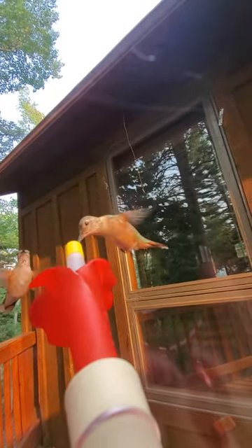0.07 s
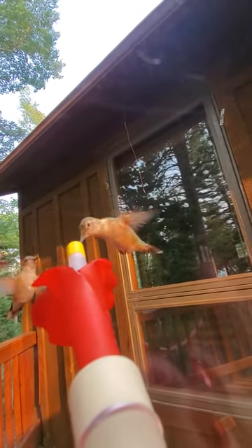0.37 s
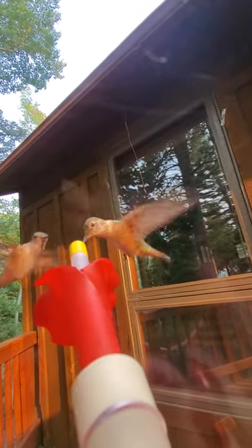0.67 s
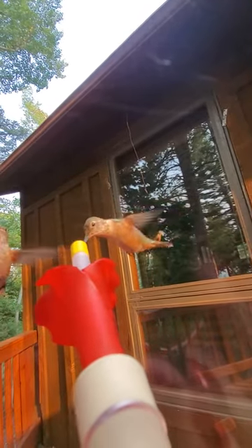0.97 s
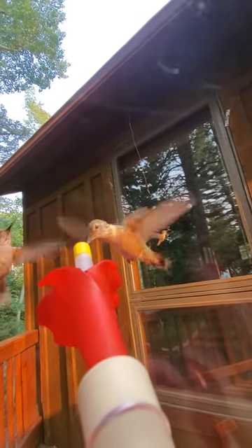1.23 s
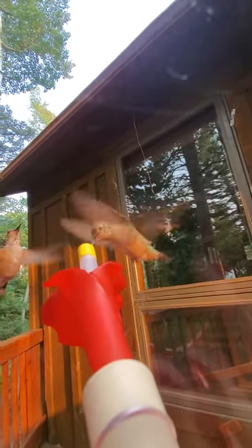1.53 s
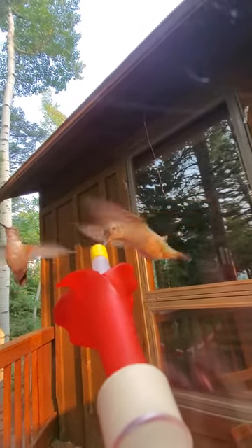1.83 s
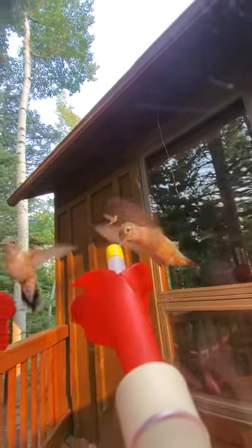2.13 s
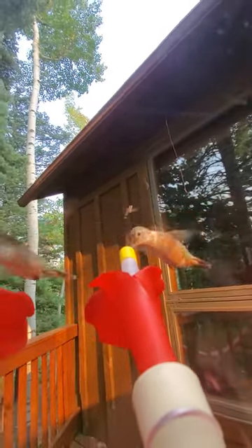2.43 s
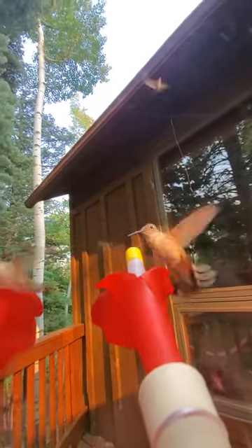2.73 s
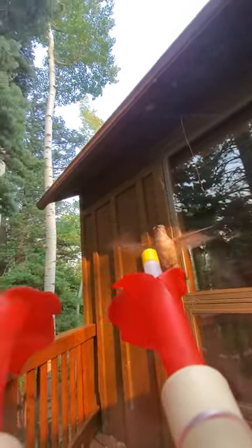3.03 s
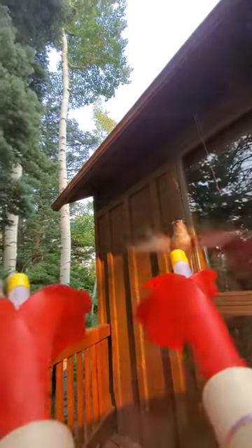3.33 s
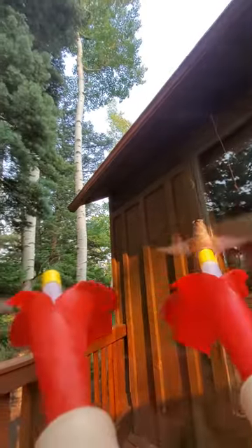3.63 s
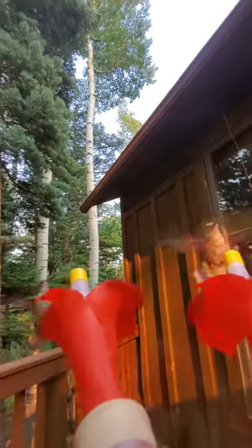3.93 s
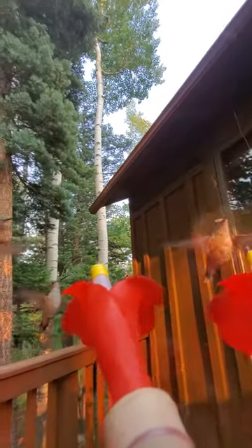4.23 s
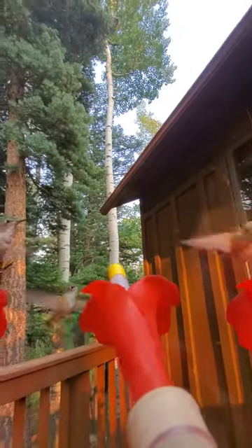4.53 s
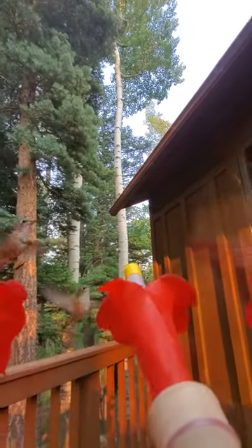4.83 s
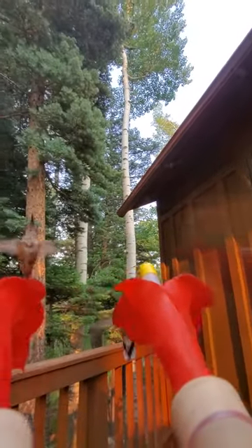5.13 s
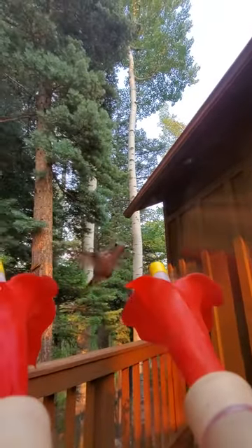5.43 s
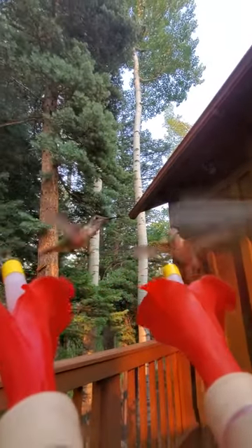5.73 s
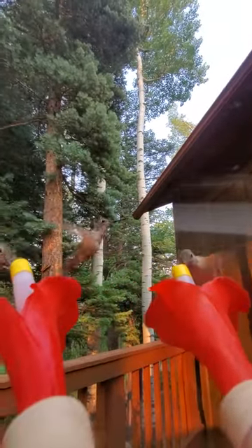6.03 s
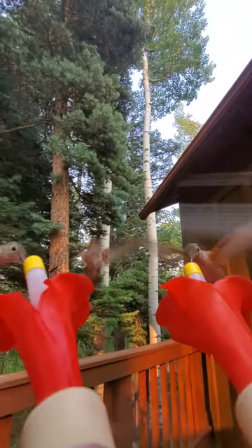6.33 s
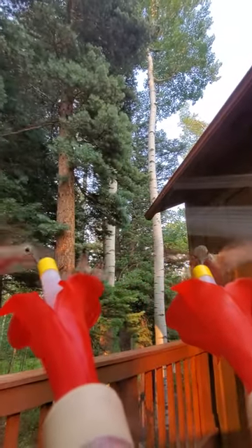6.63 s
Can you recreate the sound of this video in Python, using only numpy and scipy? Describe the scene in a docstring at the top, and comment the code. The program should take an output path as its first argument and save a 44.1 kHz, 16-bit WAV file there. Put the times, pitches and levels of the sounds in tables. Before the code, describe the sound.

A deep, pulsing buzz of hummingbird wings right by the microphone, with sharp falling chirps and a few light knocks on plastic feeders.

```python
"""A low, throbbing hum of hummingbirds hovering close by at feeders on a wooden porch.
Three birds push the air at slightly different wingbeat rates, so their hums beat against each other,
while their feathers swish and fizz. They trade short, falling chips, and the plastic feeders ring
under a few light knocks; both reflect from the porch. A soft outdoor hiss lies under it all."""
import sys
import numpy as np
from scipy import signal
from scipy.fft import rfft, irfft, next_fast_len
from scipy.io import wavfile
from scipy.ndimage import uniform_filter1d

SR = 44100
rng = np.random.default_rng(int(sys.argv[2]) if len(sys.argv) > 2 else 0)


def wav_out(sig):
    """Save sig, one row per channel (or a flat mono array), as 16-bit PCM at SR to the path in sys.argv[1]."""
    wavfile.write(sys.argv[1], SR, np.round(np.clip(np.atleast_2d(sig).T, -1, 1) * 32767).astype(np.int16))


N = 299439
TIME = np.arange(N) / SR

# Flight of the two slower birds: time_s, wingbeat_hz, hum_db (levels in all tables are relative)
SLOW_FLIGHT = [(0.0, 38.16, -35.8), (0.28, 36.46, -32.5), (0.9, 39.5, -38.9), (1.62, 36.82, -31.8),
               (1.82, 37.66, -31.1), (1.99, 36.24, -36.9), (2.34, 37.62, -30.0), (2.78, 38.12, -34.6),
               (3.12, 34.68, -37.5), (4.38, 34.39, -40.8), (4.56, 35.21, -37.7), (5.29, 36.03, -33.5),
               (5.52, 36.71, -34.6), (5.76, 38.44, -32.3), (5.94, 37.29, -36.2), (6.13, 37.89, -33.8),
               (6.28, 39.75, -37.3), (6.79, 37.8, -36.1)]
MIDDLE_FLIGHT = [(0.0, 40.86, -32.4), (0.31, 41.14, -38.9), (0.56, 42.25, -32.7), (0.9, 40.4, -37.5),
                 (1.67, 41.82, -37.1), (2.4, 40.03, -43.1), (2.63, 39.81, -38.7), (3.84, 39.91, -42.7),
                 (4.17, 39.58, -36.8), (4.42, 40.21, -37.4), (4.8, 38.14, -34.7), (5.09, 37.66, -31.8),
                 (5.26, 38.5, -40.1), (5.77, 40.67, -39.3), (5.99, 41.07, -32.8), (6.2, 39.9, -32.8),
                 (6.36, 42.37, -32.7), (6.79, 39.76, -34.6)]


def wings(flight, level_db, beat_db, third_db, overtone_db, churn_db, side_db):
    """Periodic forcing: two pushes a beat sound twice the beat rate; unequal strokes add odd harmonics."""
    # Spectral envelope of the strokes' overtones: frequency_hz, level_db
    overtones = [(100, -2), (150, 4), (200, -3), (270, -6), (380, -10), (520, -19), (900, -45)]
    # Spectrum of the churned air: frequency_hz, level_db
    turbulence = [(20, -50), (45, 6), (70, -4), (105, 6.5), (160, 5.5), (260, -7.5), (420, -13.5),
                  (650, -32.5), (1000, -30), (3000, -41.5), (9000, -50)]
    jitter_cycles, uneven_db = 0.013, 2.88
    beat_hz, hum_db = follow(flight)
    phase = phase_of(beat_hz) + 2 * np.pi * jitter_cycles * wander(32)
    odd = gain_of(beat_db) * np.sin(phase) + gain_of(third_db) * np.sin(3 * phase)
    # a louder hum has more equal strokes
    odd *= gain_of(uneven_db * wander(10.5) - 0.53 * (hum_db - hum_db.mean()))
    hum = np.sqrt(2) * gain_of(hum_db + level_db) * (np.cos(2 * phase) + odd)
    # the wing flips at the end of a stroke: a sharp push, rich in overtones
    flip = sum(gain_of(value_at(overtones, k * beat_hz.mean())) * np.sin(k * phase) for k in range(4, 22))
    flip = unit_rms(flip * gain_of(uneven_db * wander(17)))
    # every stroke sheds a puff of turbulent air
    puffs = unit_rms(gain_of(1.6 * np.cos(2 * phase) + np.cos(phase)))
    churn = puffs * noise(turbulence, turbulence, patchy_db=-1)
    slap = slap_gain(hum_db) * (gain_of(overtone_db) * flip + gain_of(churn_db) * churn)
    return pan(hum, side_db) + pan(slap, 0.51 * side_db)


def slap_gain(hum_db, base_db=-43.5, hum_share=0.28):
    """Amplitude envelope of the wings' slap: it follows the hum and swells with harder strokes."""
    # Flurries as the birds jostle: centre_s, length_s, boost_db
    flurries = [(.25, .3, -0.5), (0.635, 0.1, 4), (0.751, .1, 7.5), (0.924, .14, 2), (1.255, 0.47, 1),
                (2.376, 0.076, 8), (2.782, .16, 3.5), (3.08, 0.75, 2.5), (3.477, 0.053, 7),
                (4.585, 0.18, 3.5), (5.087, 0.084, 5), (5.32, .12, 3), (5.513, 0.42, 5), (5.838, 0.12, 4),
                (6.74, 0.19, 8)]
    flurry_db = sum(boost_db * np.cos(np.pi * np.clip((TIME - centre_s) / length_s, -.5, .5)) ** 2
                    for centre_s, length_s, boost_db in flurries)
    return gain_of(base_db + hum_share * (hum_db - hum_db.mean()) + flurry_db)


def darts():
    """A darting bird's few hard strokes radiate a low tone burst that swells and fades."""
    # Bursts of strokes: centre_s, level_db, pitch_hz, length_s
    bursts = [(.903, -16.5, 95, 0.053), (1.31, -29, 78, .08), (2.362, -24, 104.3, 0.1),
              (2.847, -20, 91, 0.062), (3.476, -27.5, 117, 0.048), (4.53, -22.5, 94, 0.051),
              (5.46, -23.5, 85, .12), (5.69, -24, 95, 0.025)]
    out = np.zeros((2, N))
    for centre_s, level_db, pitch_hz, length_s in bursts:
        t = np.arange(-length_s / 2, length_s / 2, 1 / SR)
        burst = gain_of(level_db) * np.hanning(len(t)) * np.cos(2 * np.pi * pitch_hz * t)
        add(out, centre_s - length_s / 2, pan(burst, side_db=-5.5))
    return out


def chips(length_s=0.032, glide_s=0.0062, sag_hz_per_s=8300, rasp=0.032, flutter_db=4):
    """Source and filter: a whistle dives in pitch, sweeping its harmonics through the bill's resonances."""
    # Calls: start_s, level_db, top_hz, low_hz, pause_s (at the top), overtone_db, side_db
    calls = [(.002, -35.5, 7100, 2080, 0, -8.5, -19), (.112, -35.5, 7300, 1970, 0, -9, -14),
             (.302, -51, 7800, 2300, 0, -12, -12), (.348, -35, 7250, 2080, 0, -9.5, -12),
             (.593, -36, 7100, 2250, 0, -9, -10), (.706, -37, 7380, 1900, 0.00014, -12, -14),
             (0.859, -37.5, 7420, 2140, 0, -9, -15.5), (1.270, -40, 6850, 2250, 0, -10.5, -10),
             (1.327, -52, 7700, 2240, 0.0019, -10, -4), (1.574, -41, 6530, 2270, 0.00014, -11, -10),
             (1.768, -55.5, 7660, 2320, .002, -7, -10), (2.068, -34.5, 7140, 2360, 0, -4, -2.5),
             (2.167, -31, 6700, 2570, 0, -6, -4.5), (2.428, -36.5, 7150, 2150, 0.0006, -9, -8),
             (2.561, -56, 7500, 2400, 0.0018, 0, -7), (3.026, -36.5, 6570, 2380, 0.00088, -6.5, -3.5),
             (3.18, -40, 6200, 2140, 0.00044, -8.5, -7), (3.626, -43.5, 5770, 2180, 0, -8, -12),
             (4.530, -39, 5910, 2220, 0.00062, -6, -11), (4.950, -36.5, 7800, 1550, 0.0018, -6, -11),
             (5.074, -36, 6900, 2190, 0.00062, -4, -12), (5.166, -35.5, 6550, 2200, 0, -2.5, -10.5),
             (5.311, -30.5, 8400, 1506, 0.0026, -5.5, -8.5), (5.452, -35, 6770, 2100, 0.0012, -8, -11),
             (5.574, -37.5, 6800, 2000, .001, -3.5, -12), (5.825, -37.5, 6130, 2040, 0.0012, -14, 16),
             (6.106, -34.5, 8530, 1470, 0.0013, -6.5, -10), (6.511, -44, 5900, 1550, 0.0022, -5.5, 12),
             (6.599, -34.5, 7100, 1250, 0.0022, -5, 7.5)]
    # Response of the throat and open bill: frequency_hz, gain_db
    bill = [(2000, 2), (2700, 4.5), (3200, -3.5), (4200, -3), (4900, 0), (5800, -6.5), (7200, 4.5),
            (8500, -5), (11000, -11.5), (14000, -1.5), (16000, -13)]
    rise_s, hold_s, drop_s, release_s = 0.00098, 0.0041, 0.0025, 0.013
    out, t = np.zeros((2, N)), np.arange(0, length_s, 1 / SR)
    # a loud head, then a weaker tail that peters out
    tail_s = np.maximum(t - hold_s, 0)
    envelope = gain_of(-8 * (1 - np.exp(-tail_s / drop_s)) - 250 * tail_s)
    envelope *= np.minimum(t / rise_s, 1) * np.clip((length_s - t) / release_s, 0, 1)
    for start_s, level_db, top_hz, low_hz, pause_s, overtone_db, side_db in calls:
        wobble = uniform_filter1d(rng.standard_normal((6, 4096)), size=48)
        wobble = unit_rms(uniform_filter1d(wobble, size=24))[:, :len(t)]
        dive_hz = (top_hz - low_hz) / (1 + np.maximum(t - pause_s, 0) / glide_s)
        hz = (low_hz + dive_hz - sag_hz_per_s * t) * (1 + rasp * wobble[0])
        phase = phase_of(hz)
        partials = [gain_of(value_at(bill, k * hz) + flutter_db * wobble[k])
                    * (k * hz < SR / 2) * np.sin(k * phase) for k in range(1, 6)]
        overtones = sum(gain_of(-4 * k) * partial for k, partial in enumerate(partials[1:]))
        bloom = np.clip((7400 - hz) / 3300, .25, 1)  # overtones grow as the pitch falls
        call = envelope * (partials[0] + bloom * gain_of(overtone_db + 7) * overtones)
        add(out, start_s, pan(gain_of(level_db + 3) * call, side_db))
    return out


def knocks(scuff_db=-8, scuff_t60_s=0.024, cutoff_hz=3100):
    """A light impact scuffs the plastic feeder and excites its damped modes; soft contact lacks treble."""
    # Blows on a feeder: start_s, level_db, side_db
    blows = [(3.181, -41.5, 7), (3.561, -39.5, 8), (4.258, -35.5, 3), (4.535, -37, 11), (4.932, -33.5, 13),
             (5.657, -30, 26), (6.210, -34, 5), (6.218, -33, 17), (6.4205, -35.5, 16)]
    # Modes of the feeder: frequency_hz, level_db, t60_s
    modes = [(647.5, 11, 0.11), (680, 10.5, 0.029), (1035, 7.5, 0.053), (1147, 2.5, 0.055),
             (1504, 6.5, 0.056), (1790, -25, 0.038), (2000, -39, .03), (2510, -11, 0.036)]
    out, t = np.zeros((2, N)), np.arange(SR // 4) / SR
    scuff_band = signal.butter(2, [550, 2200], "bandpass", fs=SR, output="sos")
    for start_s, level_db, side_db in blows:
        ring = np.zeros(len(t))
        for hz, mode_db, t60_s in modes:
            decay = gain_of(mode_db + 2 * rng.standard_normal() - 60 * t / t60_s)
            ring += decay * rng.choice([-1, 1]) * np.sin(2 * np.pi * hz * t)
        scuff = unit_rms(signal.sosfilt(scuff_band, rng.standard_normal(len(t))))
        scuff *= gain_of(scuff_db - 60 * t / scuff_t60_s)
        knock = ring / abs(ring).max() + scuff
        add(out, start_s, pan(gain_of(level_db + 1.4) * knock, side_db))
    return signal.sosfilt(signal.butter(4, cutoff_hz, fs=SR, output="sos"), out)


def feather_swish():
    """Modulated flow noise: once a beat the slowest bird's feathers rush through the air."""
    # Strength of the swish as the wings face the microphone: time_s, level_db
    swells = [(0, -54.5), (.9, -59), (1.7, -56), (1.9, -61.5), (2.4, -58), (2.9, -62), (3.5, -79),
              (4.4, -92), (5.1, -63), (5.8, -58.5), (6.2, -70), (6.79, -56)]
    # Spectrum of the swish: frequency_hz, level_db
    spectrum = [(300, 7), (800, -4), (1060, -1), (1350, -10), (2050, 0.5), (3100, -8), (4200, -15.5),
                (5200, -11), (6800, -12.5), (8000, -26), (11000, -25), (14000, -12), (16000, -13)]
    phase = phase_of(follow(SLOW_FLIGHT)[0])
    strokes = .35 + np.exp(2.5 * (np.cos(phase) - 1))
    hiss = noise(spectrum, spectrum, patchy_db=3)
    strokes = unit_rms(strokes * gain_of(1.5 * wander(16.3)))
    return pan(gain_of(follow(swells)[0]) * strokes * hiss, side_db=-6)


def feather_fizz(level_db=-70.5):
    """Flow noise between the wing tips ticks on both strokes; two birds' ticks merge into a high fizz."""
    # Spectrum of the fizz: frequency_hz, level_db
    spectrum = [(6000, -25), (9500, -9), (11300, -8), (12500, -6.5), (15500, -0.5), (17000, -34)]
    phases = [phase_of(follow(flight)[0]) for flight in (SLOW_FLIGHT, MIDDLE_FLIGHT)]
    ticks = .4 + sum(np.exp(3 * (np.cos(2 * phase) - 1)) * gain_of(2.5 * wander(40)) for phase in phases)
    hiss = noise(spectrum, spectrum, patchy_db=1)
    return pan(gain_of(level_db) * unit_rms(ticks) * hiss, side_db=-6)


def porch(direct, early_db=-10, early_t60_s=0.055, tail_db=-13):
    """Reverberation: early reflections from feeder, wall and eaves, then a tail whose treble dies first."""
    # Reverberation time of the porch: frequency_hz, t60_s
    decay_times = [(500, .22), (4000, .2), (7000, .19), (10000, .12), (16000, .08)]
    size = SR // 2
    taps = rng.standard_normal((2, size)) * (rng.random((2, size)) < .1)
    taps[:, :round(.001 * SR)] = 0
    hz, t, spectra = signal.stft(taps, SR, nperseg=256)
    decay = gain_of(-60 * t / value_at(decay_times, hz)[:, None])
    tail = signal.istft(spectra * decay, SR, nperseg=256)[1][:, :size]
    early = taps[::-1] * gain_of(-60 * TIME[:size] / early_t60_s)
    response = gain_of(tail_db) * tail / np.linalg.norm(tail[0])
    response += gain_of(early_db) * early / np.linalg.norm(early[0])
    return direct + signal.fftconvolve(direct.mean(0)[None], response, axes=1)[:, :N]


def air_rush():
    """Narrow-band noise near 1 kHz: a thin rush of air that swells and fades."""
    # Strength of the rush: time_s, level_db
    swells = [(0, -84), (.55, -60), (1.2, -78), (1.8, -71.5), (2.15, -61.5), (2.8, -72), (3.3, -65.5),
              (3.8, -74), (6.79, -78)]
    # Spectrum of the rush: frequency_hz, level_db
    spectrum = [(600, -40), (900, -14), (1060, -0.5), (1200, -28), (1500, -54)]
    return gain_of(follow(swells)[0]) * noise(spectrum, spectrum, patchy_db=2.5)


def outdoor_air(level_db=-54):
    """Broadband ambient noise: steady air with a thin, high hiss."""
    # Spectrum of the air on each side: frequency_hz, level_db
    left = [(30, -29), (430, -1.5), (600, 7.5), (690, 2), (880, -15), (1100, -11), (1500, -19), (1850, -15),
            (2200, -32), (3000, -26), (4500, -36.5), (6500, -26.5), (9000, -46), (15000, -23.5)]
    right = [(30, -43), (300, -12.5), (500, -0.5), (680, -12), (1100, -17.5), (1800, -7), (2400, -19),
             (2900, -19.5), (4500, -65), (6500, -26.5), (8000, -27.5), (11000, -29.5), (13000, -23.5),
             (15500, -27)]
    return gain_of(level_db) * noise(left, right, patchy_db=1.83)


def noise(left, right, patchy_db):
    """Partly coherent stereo noise with a spectrum for each side, its level drifting in patches."""
    # Likeness of left and right: frequency_hz, coherence
    likeness = [(50, 1), (300, 0.87), (700, 0.37), (1500, 0), (5000, 0.22), (15000, 0)]
    hz = np.fft.rfftfreq(2048, 1 / SR)
    real, imag, other_real, other_imag, patches = rng.standard_normal((N // 512 + 5, 1025, 5)).T
    patches = uniform_filter1d(patches, size=16, axis=0)  # across frequency
    patches = unit_rms(uniform_filter1d(patches, size=8, axis=1))  # across time
    coherence = np.clip(value_at(likeness, hz), 0, 1)[:, None]
    shared, separate = real + 1j * imag, other_real + 1j * other_imag
    spectra = np.array([shared, coherence * shared + np.sqrt(1 - coherence ** 2) * separate])
    colour_db = np.array([value_at(left, hz), value_at(right, hz)])[:, :, None]
    spectra *= gain_of(colour_db + patchy_db * patches)
    x = signal.istft(spectra, nperseg=2048, noverlap=1536)[1][:, :N]
    return x / x.mean(0).std()


def wander(rate_hz):
    """Low-passed noise: a random drift of rms 1."""
    size = next_fast_len(N)
    hz = np.fft.rfftfreq(size, 1 / SR)
    spectrum = rfft(rng.standard_normal(size)) * np.exp(-(hz / rate_hz) ** 2)
    return unit_rms(irfft(spectrum, size)[:N])


def pan(x, side_db, delay_s=0.0002):
    """Level and time differences: side_db is left minus right, and the far side hears it later."""
    gains = gain_of(np.array([[side_db], [-side_db]]) / 2)
    out = x * gains / gains.mean()
    lag, far = round(delay_s * SR), int(side_db > 0)
    out[far] = np.r_[np.zeros(lag), out[far]][:out.shape[1]]
    return out


def add(mix, start_s, sound):
    """Superposes a stereo sound on the mix."""
    part = mix[:, max(0, round(start_s * SR)):][:, :sound.shape[1]]
    part += sound[:, :part.shape[1]]


def follow(rows):
    """Interpolates each column of a time table at every sample."""
    time_s, *columns = np.transpose(rows)
    return [np.interp(TIME, time_s, column) for column in columns]


def value_at(points, hz):
    """Interpolates a table on a log-frequency axis."""
    frequency_hz, values = np.transpose(points)
    return np.interp(np.log(hz + 1), np.log(frequency_hz + 1), values)


def phase_of(hz):
    """Phase in radians, the integral of frequency."""
    return 2 * np.pi * np.cumsum(hz) / SR


def gain_of(db):
    """Decibels to amplitude."""
    return 10 ** (np.asarray(db) / 20)


def unit_rms(x):
    """Scales to rms 1."""
    return x / np.sqrt(np.mean(x ** 2) + 1e-20)


def scene():
    """Superposition: three close hums interfere and throb; only chips and knocks reverberate."""
    # Flight of the fastest, most restless bird: time_s, wingbeat_hz, hum_db
    fast_flight = [(0.0, 42.99, -33.7), (0.52, 44.1, -43.0), (0.94, 45.21, -43.1), (1.26, 39.77, -39.0),
                   (1.72, 37.15, -38.0), (1.98, 42.4, -37.1), (2.32, 44.15, -38.9), (2.65, 43.71, -32.6),
                   (2.79, 47.56, -35.2), (3.1, 43.78, -45.3), (3.94, 40.08, -42.8), (4.18, 37.82, -42.6),
                   (5.1, 41.19, -45.8), (5.33, 40.32, -37.4), (5.77, 43.54, -38.0), (6.01, 43.03, -40.8),
                   (6.21, 41.83, -27.4), (6.79, 40.44, -26.8)]
    slow = wings(SLOW_FLIGHT, 0.6, beat_db=-14, third_db=-8.5, overtone_db=-4.5, churn_db=-6, side_db=-7)
    middle = wings(MIDDLE_FLIGHT, 1.2, beat_db=-15, third_db=-11, overtone_db=-6, churn_db=-2, side_db=-6.5)
    fast = wings(fast_flight, 0.4, beat_db=-7.5, third_db=-18, overtone_db=-7, churn_db=-4, side_db=-6.5)
    birds = slow + middle + fast + darts() + feather_swish() + feather_fizz()
    return birds + porch(chips() + knocks()) + air_rush() + outdoor_air()


def record(dry, cutoff_hz=15950):
    """Band limiting: the microphone sheds the deepest rumble, and a low-pass cuts the highest treble."""
    # Bass roll-off: frequency_hz, gain_db
    roll_off = [(22, -24), (30, -13), (36, 0)]
    size = next_fast_len(N + SR)
    hz = np.fft.rfftfreq(size, 1 / SR)
    x = irfft(rfft(dry, size) * gain_of(value_at(roll_off, hz)), size)[:, :N]
    x *= np.minimum(TIME / 0.002, 1)  # a soft start
    low_pass = signal.firwin(511, cutoff_hz, window=("kaiser", 9), fs=SR)
    return signal.oaconvolve(x, low_pass[None], "same")


dry = scene()
out = record(dry)
wav_out(out)
```